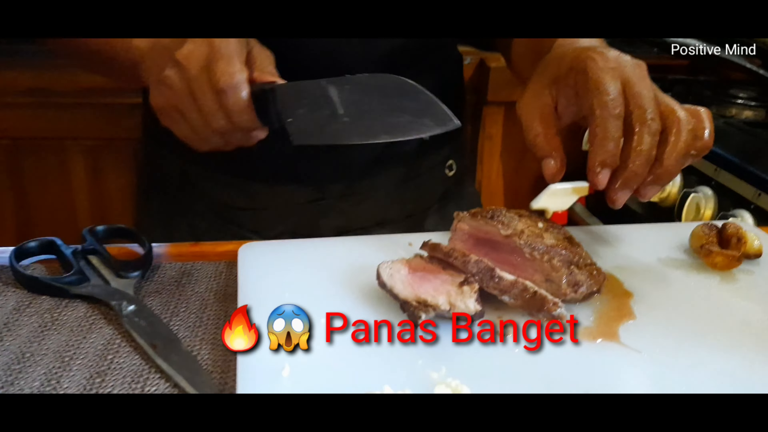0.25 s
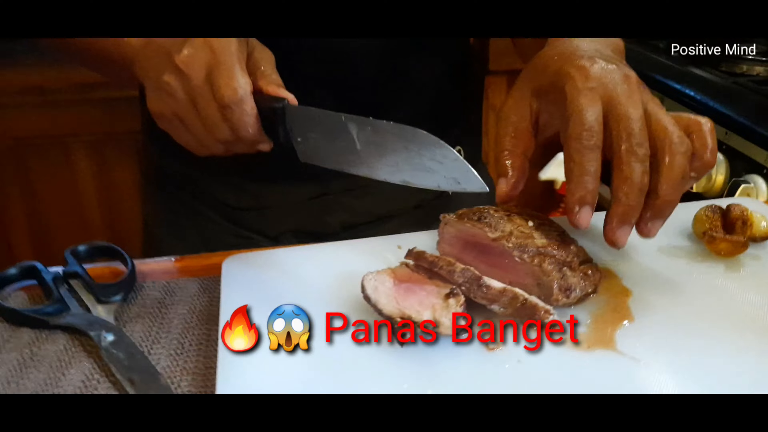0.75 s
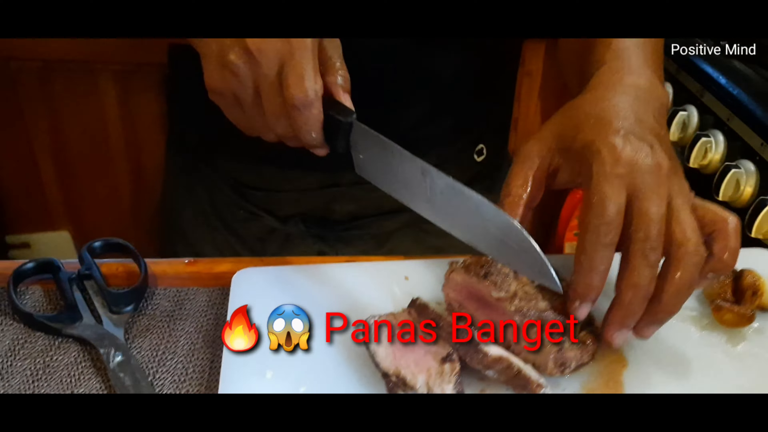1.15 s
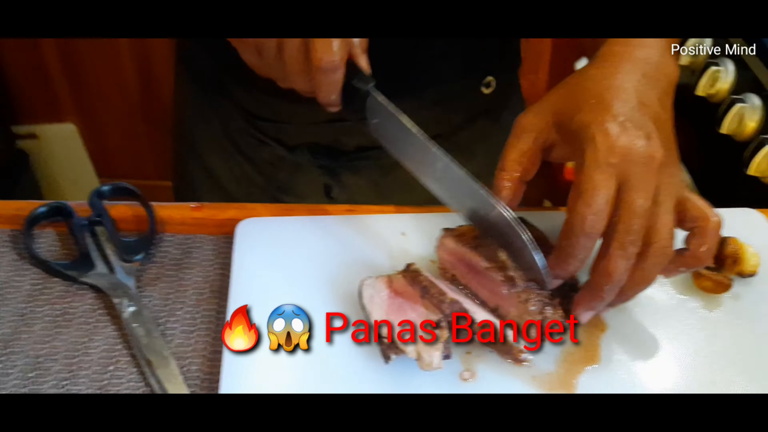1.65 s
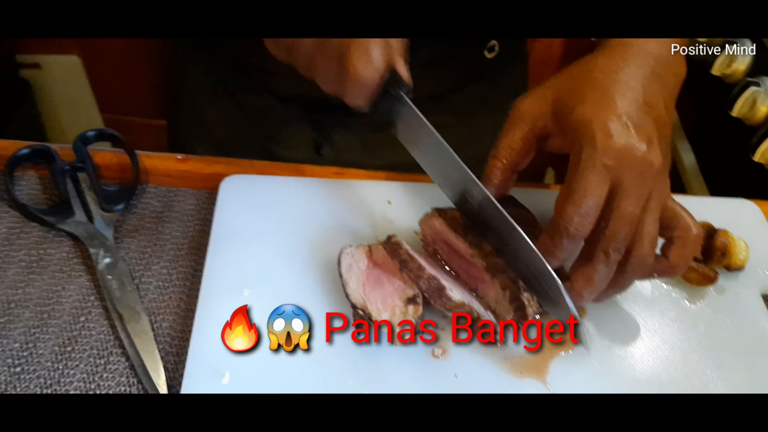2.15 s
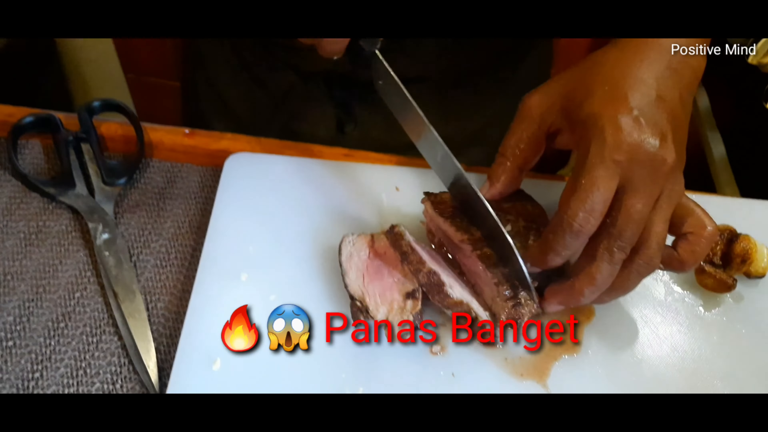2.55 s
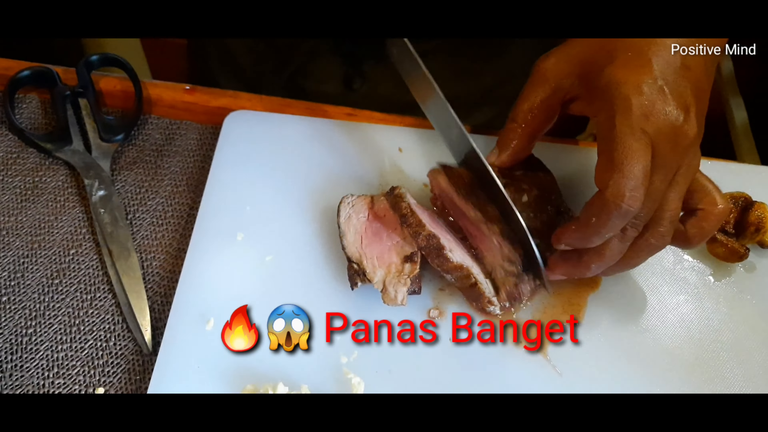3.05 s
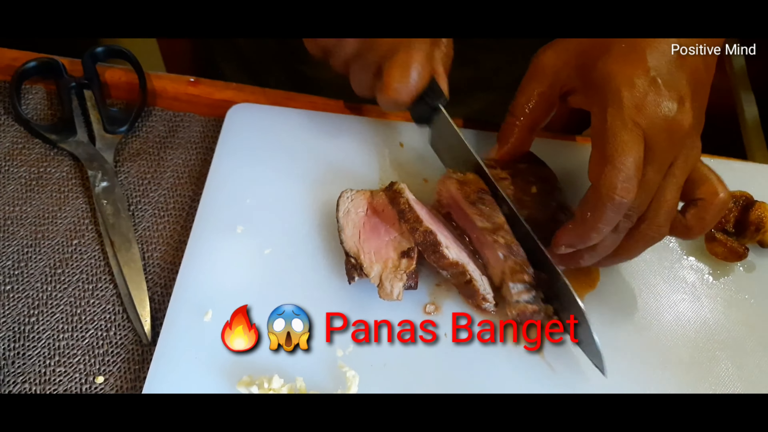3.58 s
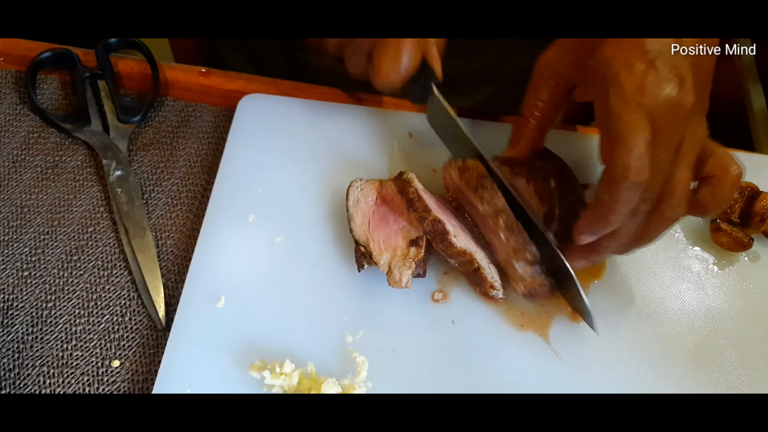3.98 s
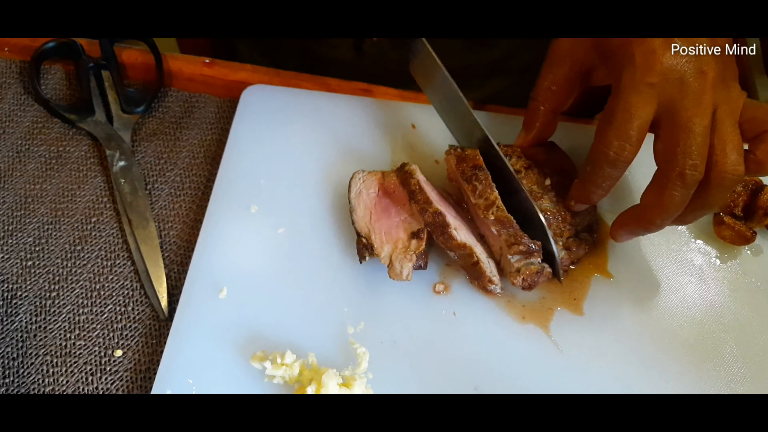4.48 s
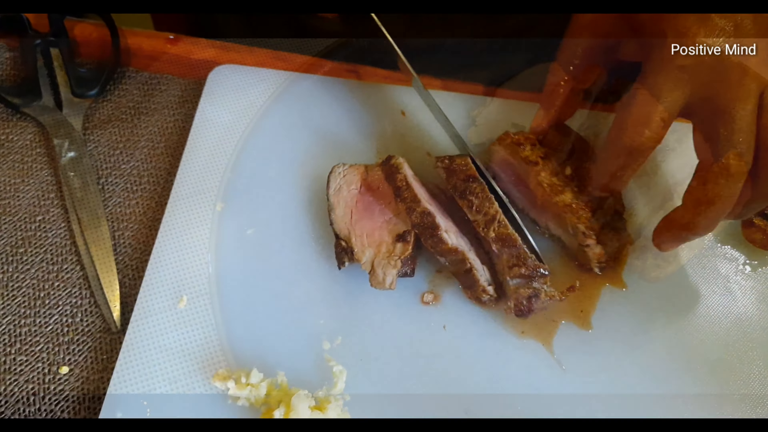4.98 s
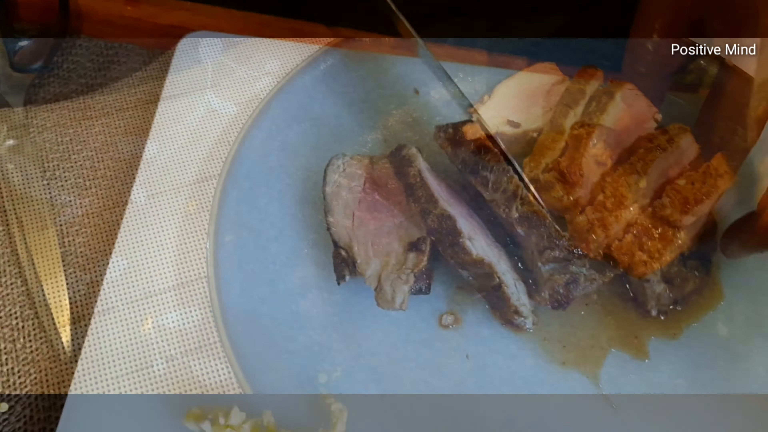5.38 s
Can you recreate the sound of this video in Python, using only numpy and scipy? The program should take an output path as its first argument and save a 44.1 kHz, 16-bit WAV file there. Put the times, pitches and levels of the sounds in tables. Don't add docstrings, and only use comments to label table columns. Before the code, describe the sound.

A heavy machine runs throughout near a home kitchen, its low buzzing hum pulsing rapidly, with repetitive loose-part clatter, casing rumble and a thin high air hiss. It leans toward the left of a handheld phone's stereo pickup. At about 0.03 seconds a knife strikes a plastic board with a sharp ringing clack and tiny fast bounces, answered by short room reflections. A thin metallic blade scrape follows at 0.25 to 0.45. Around 1.4 the hum steps up slightly as if nearer, while the hiss rises more gradually from 1 to 2.1. A light tick with wet fizz comes at 1.6, then faint moist slicing at 2.2, 2.4, 2.7, 2.9, 3.2 and 3.7. Soft board taps sound near 3.2 and 4.3, with a very faint one at 2.7. A brief wet cut lands at 4.6 as the level dips, and the drone gradually dissolves into a quieter, differently coloured hum until the end.

```python
import sys
import numpy as np
from scipy import signal
from scipy.fft import rfft, irfft
from scipy.io import wavfile
from scipy.ndimage import uniform_filter1d

SR = 44100
rng = np.random.default_rng(int(sys.argv[2]) if len(sys.argv) > 2 else 0)


def to_wav(s):
    ch = np.atleast_2d(s).T
    pcm = np.round(np.clip(ch, -1, 1) * 32767)
    wavfile.write(sys.argv[1], SR, pcm.astype(np.int16))


def decibels_to_gain(level_db):
    exponent = np.asarray(level_db, float) / 20
    return 10 ** exponent


N = 247842
T = np.arange(N) / SR

# multiple of the shaft rate, level/dB, left minus right/dB
SHAFT_LINES = [(3, -26.0, 8), (4, -44.1, 8), (5, -51.6, 10), (6, -46.5, 3), (7, -52.0, 8), (8, -49.3, 6),
               (9, -33.2, 9), (10, -44.3, 6), (11, -46.1, 5), (12, -36.5, 3), (13, -52.1, 4),
               (14, -39.8, 5), (15, -30.1, 6), (16, -43.2, 8), (17, -47.3, 8), (18, -52.0, 7),
               (20, -49.4, 4), (21, -44.9, 5), (22, -48.8, 8), (23, -50.6, 6), (24, -45.4, 4),
               (26, -45.5, 11), (27, -42.9, 8), (28, -53.9, 4), (37, -51.1, -2), (38, -47.5, 12),
               (39, -52.7, 9), (42, -44.9, 4), (43, -48.0, 3), (46, -56.7, 18),
               (35, -57, 0), (41, -56, 4), (47, -52, 7), (53, -58, -3), (54, -54, 3), (56, -54, 7),
                (59, -57, 2), (60, -57, 0), (61, -52, 8), (67, -58, 9), (77, -57, 5), (80, -58, 5)]
SWELL = [(3, .52), (6, .25), (9, .7), (12, .05), (15, .31), (21, .2), (27, .37)]
RANGE_STARTS = [0, 8, 11, 14, 18, 99]
# f/Hz, level/dB per Hz
RUMBLE_COLOUR = [(15, -77), (30, -64), (60, -63.5), (200, -64), (280, -60), (345, -69), (420, -68),
                 (480, -65.5), (560, -70.5), (900, -77), (1500, -138.5)]
# f/Hz, level/dB per Hz
DRONE_COLOUR = [(296, -107), (305, -50.5), (327, -53.5), (336, -83), (450, -103), (460, -61.5),
                (478, -61.5), (488, -105)]
# f/Hz, level/dB per Hz
CLATTER_COLOUR = [(400, -6), (700, -7), (1100, -2.5), (1340, 2), (1650, -5), (2100, -3), (2400, -9),
                  (2900, -12), (4000, -13.5), (6300, -17.5), (7600, -22), (8200, -67), (11000, -70)]
# f/Hz, common share/1
CLATTER_ALIKE = [(500, 0.15), (1400, 0.35), (2200, 0.35), (3200, 0.086), (6000, 0.13)]
# f/Hz, level/dB per Hz
HISS_COLOUR = [(6000, -30), (7800, -16), (8600, -11), (9400, -4), (10500, -2), (12500, 0), (15000, -2),
               (15450, -4), (15550, -40)]
# place/turn, dull level/dB, bright level/dB, length/turn
KNOCKS = [
    (.03, 11, -9, 0.014),
    (.12, -3.5, 2.5, 0.27),
    (.37, -3, 6.5, 0.034),
    (0.533, 18, 1.5, 0.0092),
    (.68, 11, -2, 0.086),
    (0.791, -24, 2, 0.0075),
    (0.942, 4, 1, 0.0051),
]
# f/Hz, level/dB, time to fall 60 dB/s, left minus right/dB
BOARD_MODES = [(363, -11, 0.1, 6), (750, -6.5, 0.037, 18), (838, -1.5, 0.047, 18), (954, -6, 0.057, 15),
               (1223, -5.5, 0.079, 5.5), (1357, 2.5, 0.1, 8.5), (1677, -11.5, 0.13, 4),
               (2133, -5.5, 0.084, 12), (2593, -2.5, 0.037, -8), (3474, -1.5, 0.1, 9),
               (4510, -24.5, 0.07, 11), (4732, -24, 0.11, 5), (5650, -17.5, 0.14, 8.5),
               (6850, -24.5, 0.12, 15)]
# t/s, level/dB, contact time/ms
CLACKS = [
    (.0328, -14.5, .08),
    (.0346, -10, 0.19),
    (.0394, -16, 0.34),
    (0.0511, -19.5, 0.37),
    (3.238, -25.5, 0.98),
    (4.292, -23.5, 1.13),
    (2.725, -33, 1.4),
]
# loudest moment t/s, level/dB, rise/dB per s, fall/dB per s
STROKES = [
    (.256, -47, 900, 500),
    (.33, -42, 250, 113),
    (.42, -52, 200, 150),
]
# t/s, tick level/dB, fizz level/dB, fizz length/s
SLICES = [
    (1.6164, -38, -44, 0.044),
    (2.208, -80, -54, 0.099),
    (2.44, -80, -54, .06),
    (2.7, -80, -53.5, 0.087),
    (2.94, -80, -58, .06),
    (3.19, -60, -49, .04),
    (3.2, -41, -60, .01),
    (3.73, -80, -53, 0.059),
    (4.596, -58, -49, .012),
]
# level/dB, shift/cycle
NEXT_LINES = [(-11.2, -.28), (-11.2, -.34), (-3.6, -.43), (-7.8, .26), (-4, -.45)]

SHAFT_HZ, START_TURN = 11.7783, -.011
SIDES = np.array([[1.], [-1.]])
PORT_LAG = 20


def shape(x, points):
    hz, db = np.transpose(points)
    bins = np.arange(N // 2 + 1) * SR / N + 1
    gain = decibels_to_gain(np.interp(np.log(bins), np.log(hz), db))
    return irfft(rfft(x) * gain, N) * np.sqrt(SR / 2)


def unit(x):
    return x / np.sqrt(np.mean(x ** 2))


def walk(rate):
    hold = int(SR / rate)
    steps = np.repeat(rng.standard_normal(N // hold + 1), hold)
    return unit(uniform_filter1d(uniform_filter1d(steps, hold), hold)[:N])


def pan(db):
    gains = decibels_to_gain(SIDES * db / 2)
    return gains / gains.mean()


def ramp(start_s, end_s):
    return np.clip((T - start_s) / (end_s - start_s), 0, 1)


def cycle(one_turn, turn):
    return np.interp(turn % 1, np.linspace(0, 1, len(one_turn)), one_turn)


def ring(x, hz, t60):
    pole = np.exp(2j * np.pi * hz / SR - np.log(1000) / (max(t60, 1e-3) * SR))
    return signal.lfilter([1], [1, -pole], x).imag


def kitchen(x):
    level_db, t60_s = -7.5, .19
    age = np.arange(SR // 4) / SR
    echoes = rng.standard_normal((2, len(age))) * decibels_to_gain(-60 * age / t60_s) * (age > .002)
    echoes = echoes / np.sqrt(np.sum(echoes ** 2, axis=1, keepdims=True))
    middle = x.mean(axis=0, keepdims=True)
    return x + decibels_to_gain(level_db) * pan(3) * signal.fftconvolve(middle, echoes, axes=1)[:, :N]


def hiss(turn):
    puff_db = 2.2 * np.cos(2 * np.pi * (turn - .9)) + .8 * walk(5)
    return pan(.43) * decibels_to_gain(puff_db) * unit(shape(rng.standard_normal((2, N)), HISS_COLOUR))


def rumble(turn):
    common, own = rng.standard_normal(N), rng.standard_normal((2, N))
    casing = pan(4.5) * shape(common + .31 * own, RUMBLE_COLOUR)
    throb = decibels_to_gain(.69 * np.cos(2 * np.pi * (turn - .5)))
    return casing + pan(11.3) * throb * shape(rng.standard_normal(N), DRONE_COLOUR)


def clatter(turn):
    place = np.linspace(0, 1, num=3744)
    near = [np.exp(-(((place - at + .5) % 1 - .5) / width) ** 2) for at, _, _, width in KNOCKS]
    _, dull_db, bright_db, _ = .75 * np.transpose(KNOCKS)
    dull, bright = cycle(decibels_to_gain(dull_db @ near), turn), cycle(decibels_to_gain(bright_db @ near), turn)
    again = np.array([cycle(v, turn) for v in rng.standard_normal((3, len(place)))])
    fresh, treble = rng.standard_normal((2, 3, N))
    rattle = again + .75 * fresh
    low = signal.lfilter(*signal.butter(2, 1100, fs=SR), rattle)
    mid = signal.lfilter(*signal.butter(2, 2800, fs=SR), rattle)
    high = signal.lfilter(*signal.butter(2, 2800, "high", fs=SR), treble)
    common, *own = dull * low + bright * (mid - low) + high
    hz, share = np.transpose(CLATTER_ALIKE)
    share = np.clip(share, .01, .99)
    both = shape(np.array([common, np.roll(common, PORT_LAG)]), np.c_[hz, 10 * np.log10(share)])
    apart = shape(np.array(own), np.c_[hz, 10 * np.log10(1 - share)])
    return pan(3.9) * unit(shape(both + apart, CLATTER_COLOUR)) * decibels_to_gain(.28 * walk(5.87))


def line_start(k):
    if k > 45:
        return rng.random()
    if k > 30:
        return -k * .435
    beat = 3 * round(k / 3)
    at, form = (.302, .57) if beat % 2 else (.078, .74)
    return form - beat * at - (k - beat) * np.interp(beat, *np.transpose(SWELL))


def hum(turn, gains, whine_gain):
    place = np.linspace(0, 1, num=4097)
    ranges = np.zeros((len(gains), 2, len(place)), complex)
    for k, db, side_db in SHAFT_LINES:
        k = round(k)
        line = np.exp(2j * np.pi * (k * place + line_start(k)) - .2j * SIDES)
        ranges[np.searchsorted(RANGE_STARTS, k, "right") - 1] += decibels_to_gain(db) * pan(side_db) * line
    step = (turn % 1 * (len(place) - 1)).astype(int)
    out = 0
    for one_range, gain in zip(ranges, gains):
        out = out + decibels_to_gain(.55 * walk(3.01)) * (gain * one_range[:, step]).real
    whine = decibels_to_gain(-43 + .8 * walk(3)) * pan(6) * np.cos(2 * np.pi * (137.24 * T - .43))
    return np.sqrt(2) * (out + whine_gain * whine)


def wet_slices():
    tick, fizz = np.zeros(N), np.zeros(N)
    for s, tick_db, fizz_db, length in SLICES:
        tick += decibels_to_gain(tick_db) * np.exp(-((T - s) / .00097) ** 2)
        fizz += decibels_to_gain(fizz_db) * (T > s) * np.exp(-((T - s) / length) ** 4)
    noise = rng.standard_normal((2, N))
    sharp = unit(shape(noise, [(8000, -30), (11500, 0), (16000, 1)]))
    wet = unit(shape(noise[::-1], [(2000, -12), (4000, 10), (7000, 7), (8500, -9), (13000, 5), (16000, -7)]))
    return tick * sharp + fizz * wet


def blade_scrape():
    noise = rng.standard_normal((2, N))
    blade = unit(ring(noise, 3440, .017))
    blade = blade + decibels_to_gain(-4) * ramp(.3, .47) * unit(ring(noise, 3150, .017))
    blade = blade + decibels_to_gain(-12) * unit(ring(noise, 5840, .004))
    blade = blade + decibels_to_gain(-15.5) * unit(ring(noise, 9700, .001))
    strokes = np.zeros(N)
    for s, db, rise, fall in STROKES:
        strokes += decibels_to_gain(db - np.maximum(rise * (s - T), fall * (T - s)))
    flicker = decibels_to_gain(1.4 * walk(42))
    return pan(2.3) * blade * (T < .47) * flicker * strokes


def board_clacks():
    push = np.zeros(N)
    for s, db, ms in CLACKS:
        bump = np.hanning(int(ms * SR / 1000) + 3)
        start = int(s * SR)
        push[start:start + len(bump)] += decibels_to_gain(db) * bump / bump.sum()
    out = 0
    for k, (hz, db, t60, side_db) in enumerate(BOARD_MODES):
        mode = (-1) ** k * ring(push, hz, min(t60, .17))
        right = np.roll(mode, PORT_LAG if hz > 1000 else 0)
        out = out + decibels_to_gain(db) * pan(side_db) * np.array([mode, right])
    return kitchen(out)


def scene():
    hunt = .0045 * np.cos(2 * np.pi * (T - 3.0) / 3.3) + .001 * walk(3)
    turn = START_TURN + SHAFT_HZ * T + hunt
    far, air_far = 1 - ramp(1.41, 1.43), 1 - ramp(1, 2.13)
    dissolve_s, length_s, step_s = 4.57, 1.0, .008
    coming = np.maximum(T - dissolve_s, 0) / length_s
    going = decibels_to_gain(-2.5 * ramp(dissolve_s - step_s, dissolve_s + step_s)) * np.maximum(1 - coming, 0)
    lines = []
    for far_db, (db, shift) in zip((-3, -2.5, -1, -2, -1), NEXT_LINES):
        lines.append(decibels_to_gain(far_db * far) * going + coming * decibels_to_gain(db) * np.exp(2j * np.pi * shift))
    casing = np.hypot(decibels_to_gain(-1 * far) * going, decibels_to_gain(-4.5) * coming)
    air = np.hypot(decibels_to_gain(-2.5 * air_far) * going, decibels_to_gain(-5.5) * coming)
    airborne = decibels_to_gain(-62 - .5 * air_far) * hiss(turn) + decibels_to_gain(-37) * clatter(turn)
    machine = casing * rumble(turn) + air * airborne + hum(turn, lines, np.hypot(going, coming))
    return machine + wet_slices() + blade_scrape() + board_clacks()


def top_cut(x):
    return signal.sosfilt(signal.butter(12, 15600, fs=SR, output="sos"), x)


def record(dry):
    return top_cut(dry)


dry = scene()
out = record(dry)
to_wav(out)
```